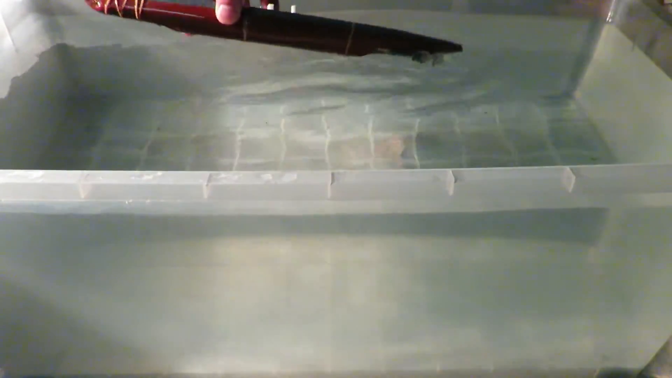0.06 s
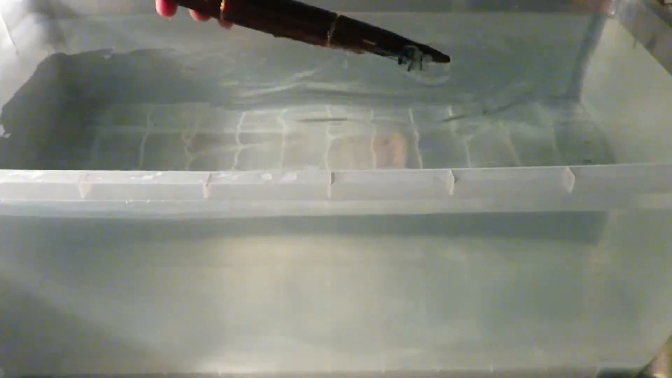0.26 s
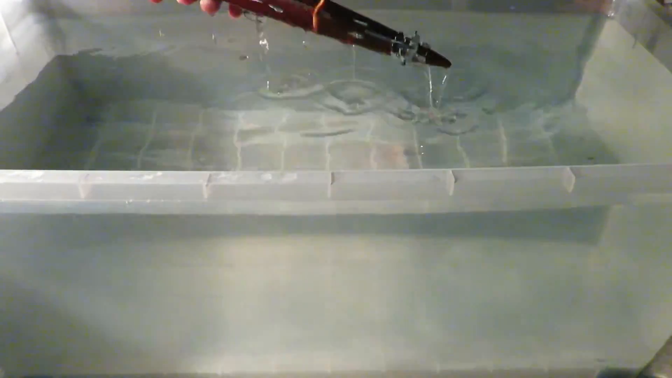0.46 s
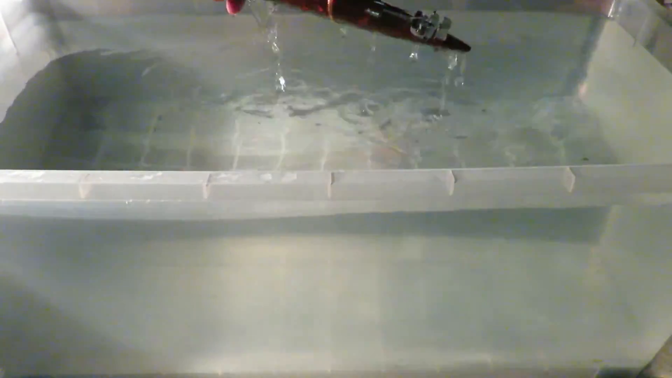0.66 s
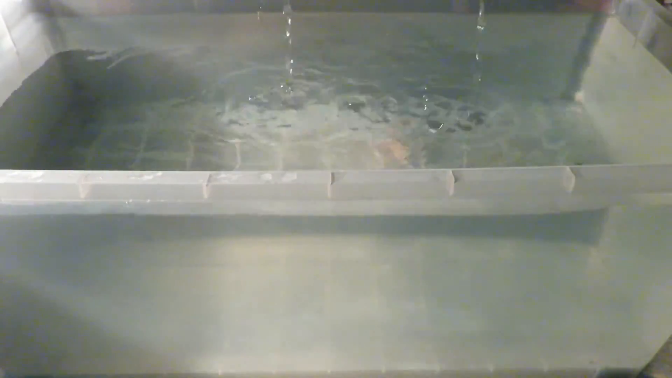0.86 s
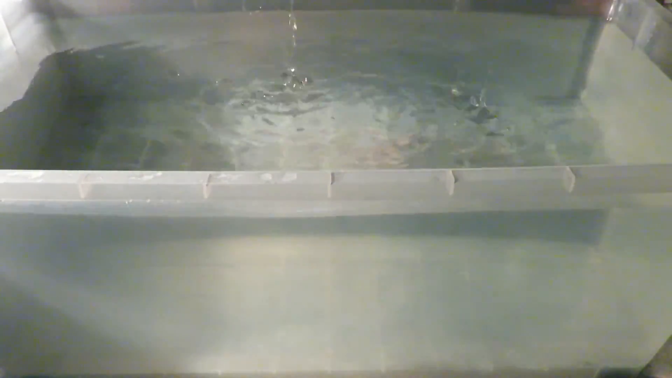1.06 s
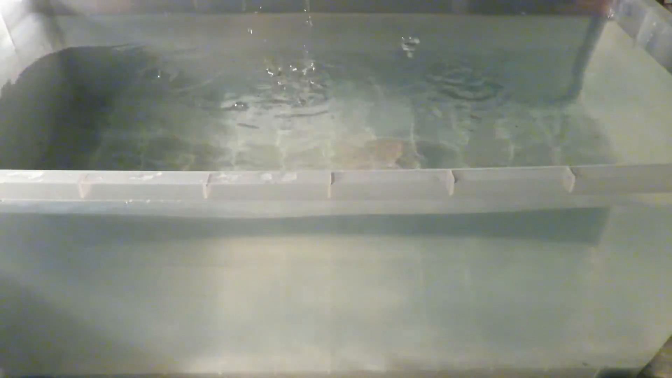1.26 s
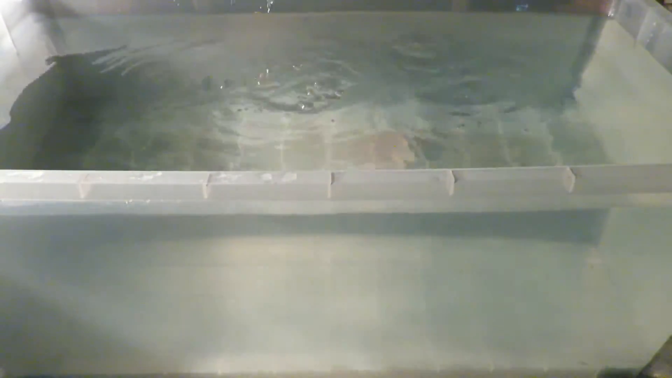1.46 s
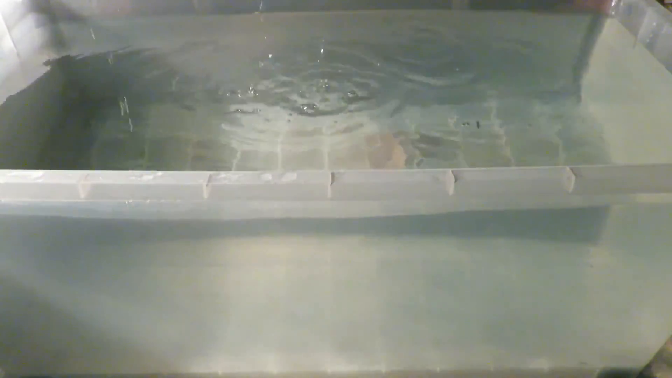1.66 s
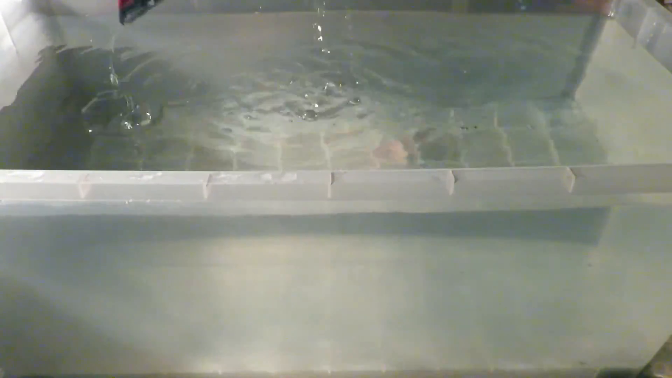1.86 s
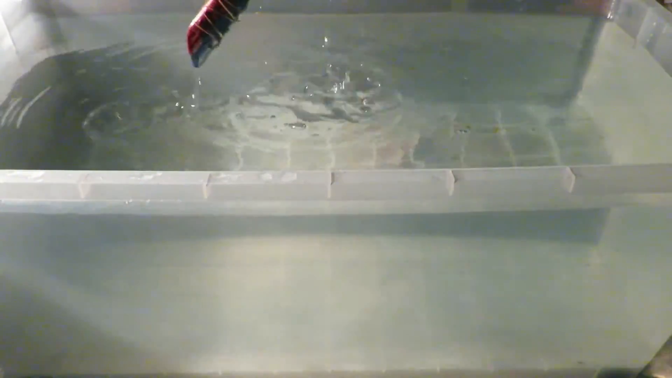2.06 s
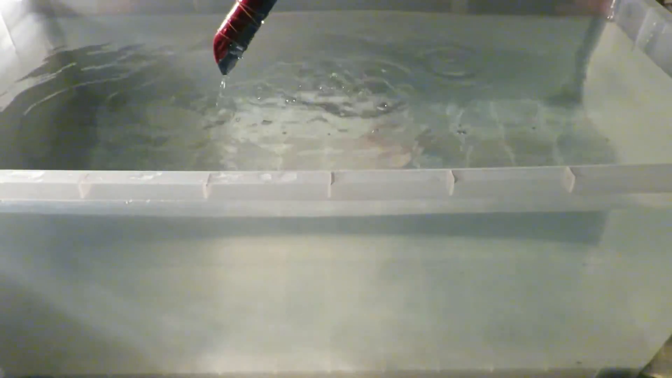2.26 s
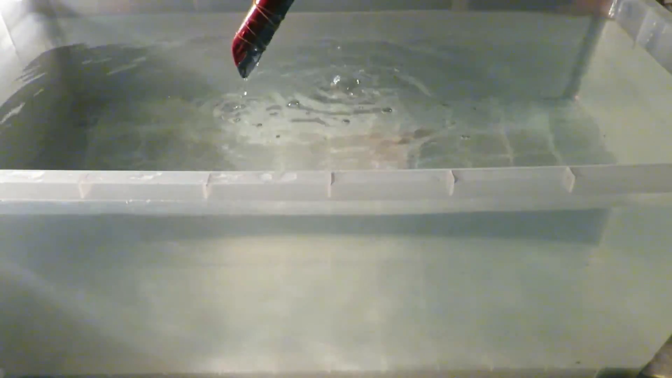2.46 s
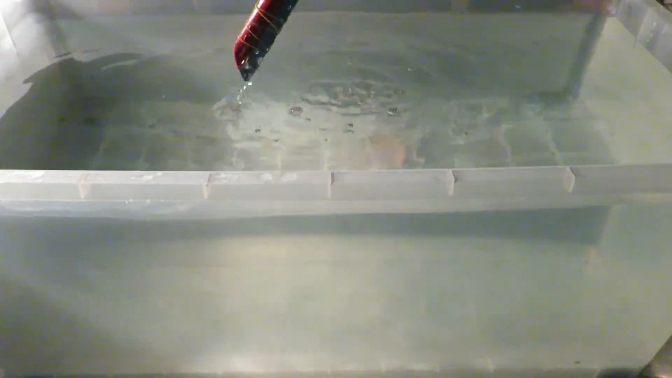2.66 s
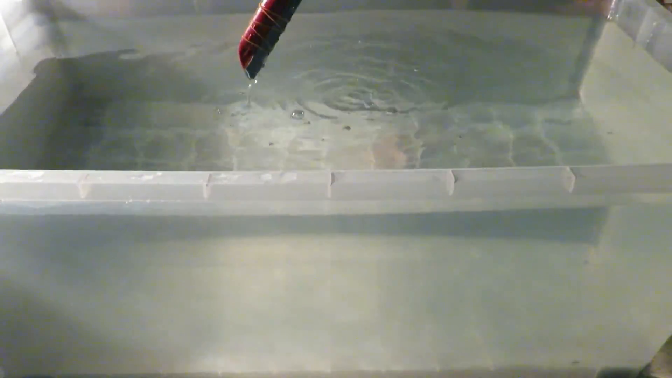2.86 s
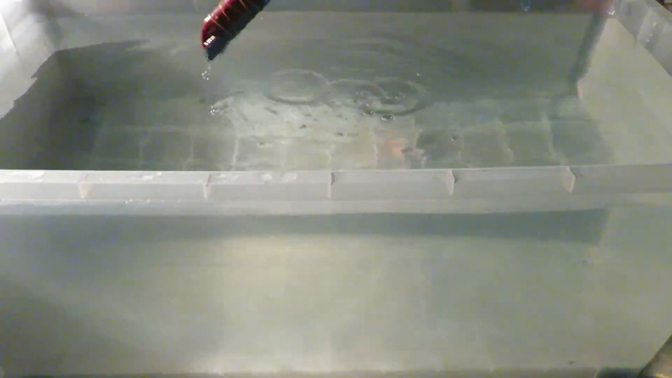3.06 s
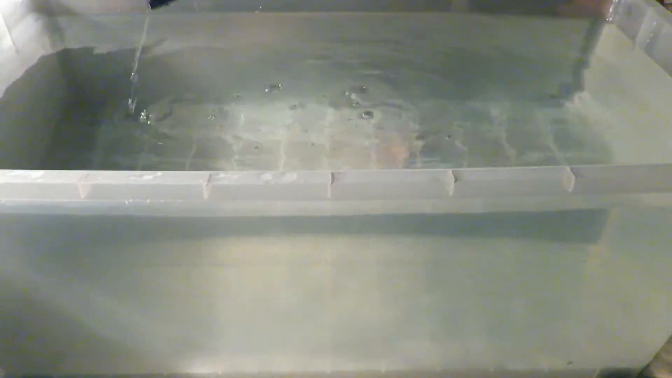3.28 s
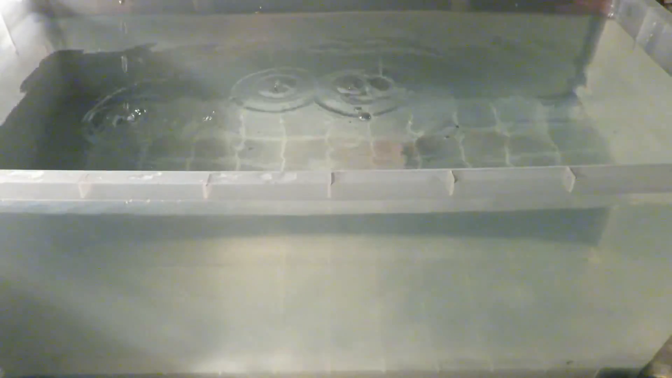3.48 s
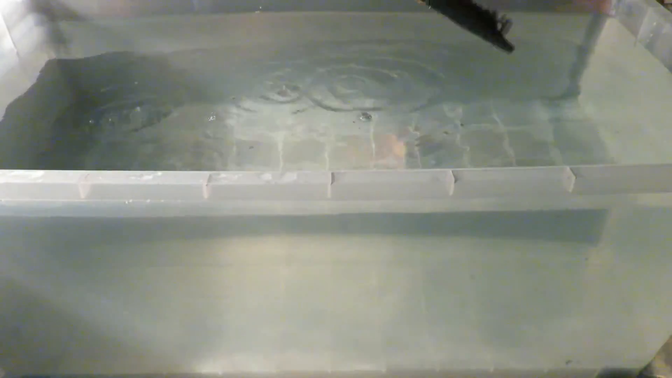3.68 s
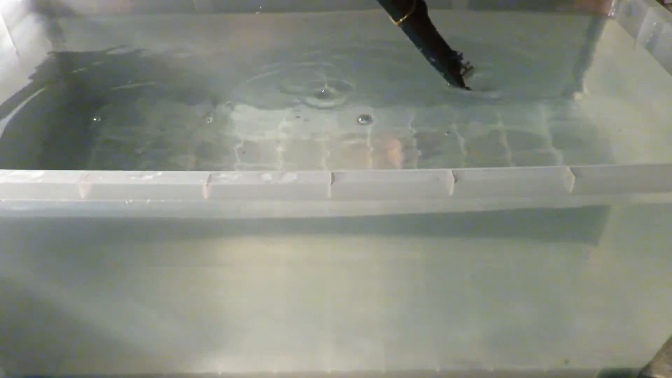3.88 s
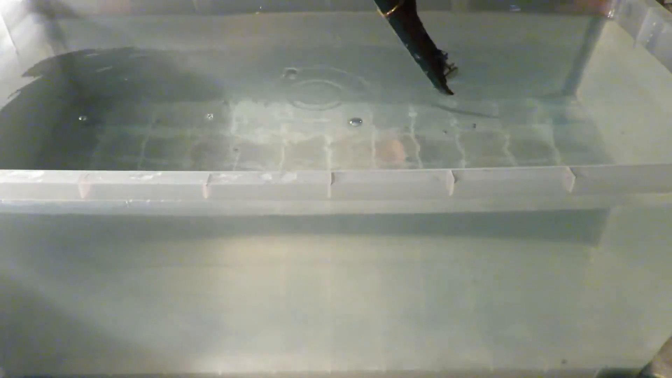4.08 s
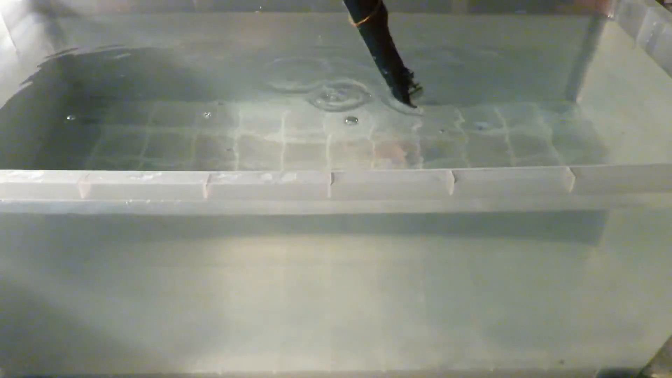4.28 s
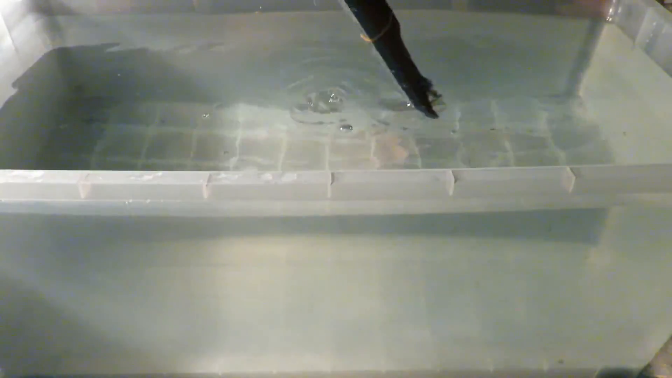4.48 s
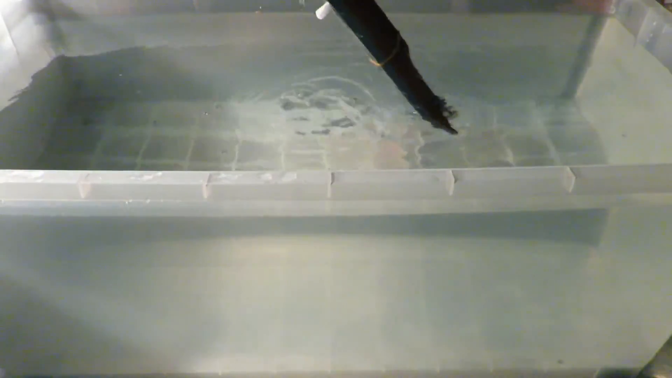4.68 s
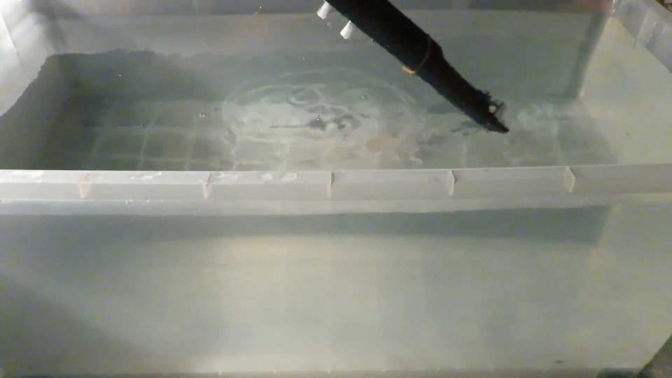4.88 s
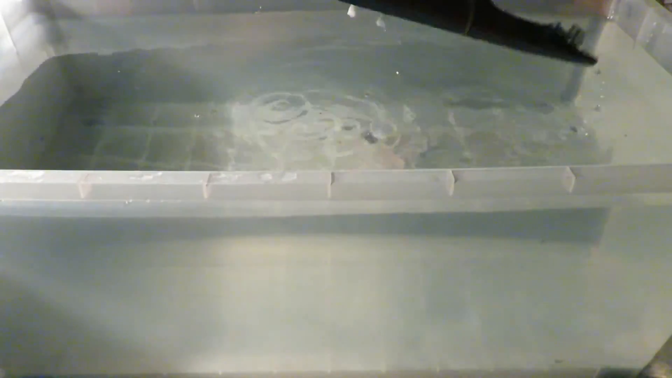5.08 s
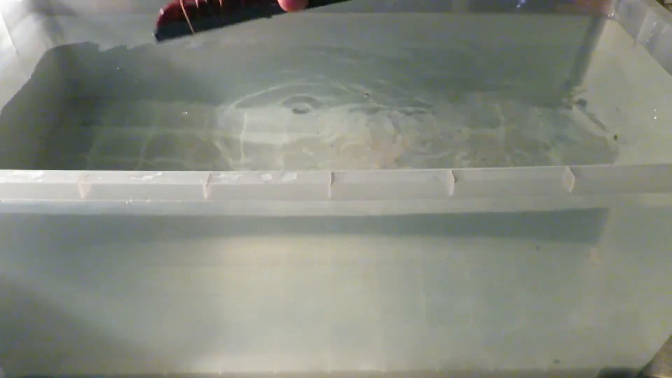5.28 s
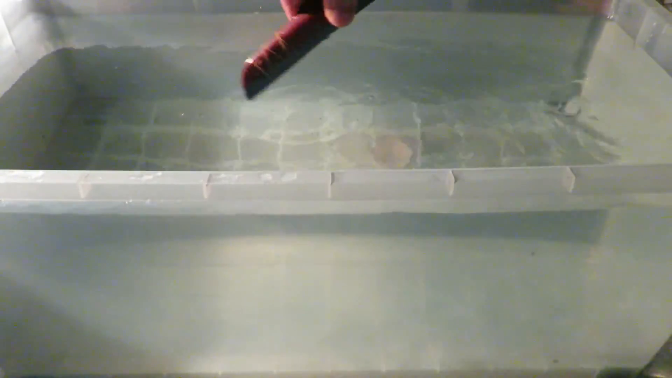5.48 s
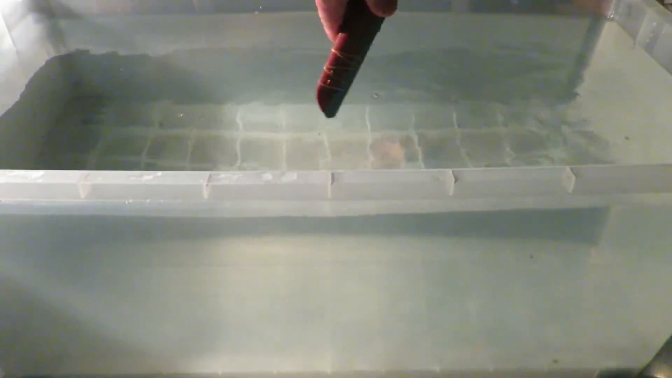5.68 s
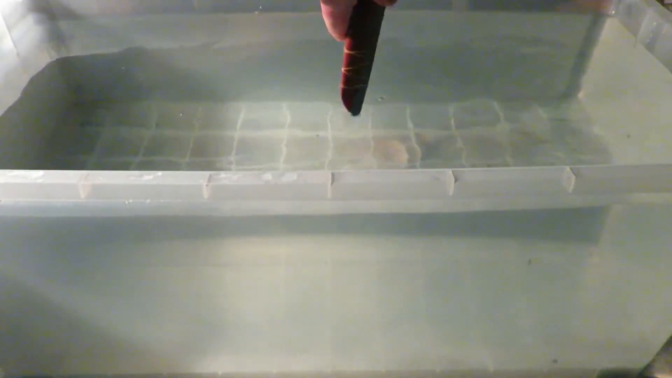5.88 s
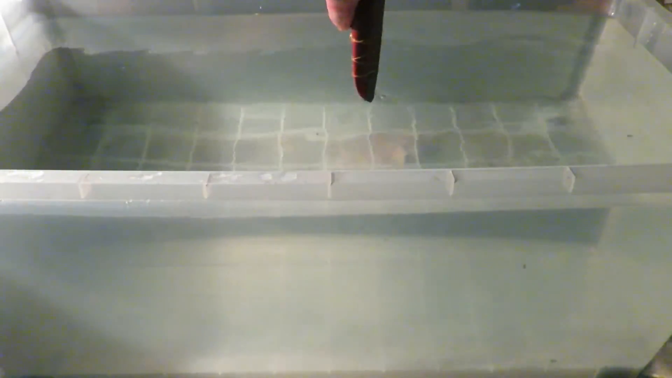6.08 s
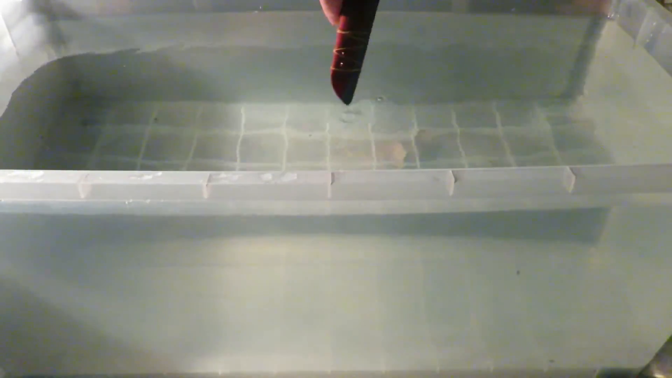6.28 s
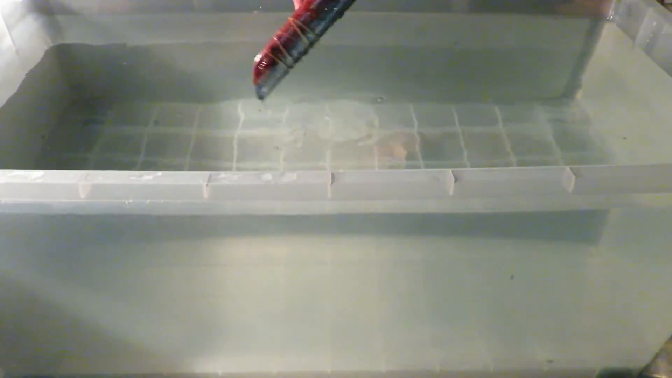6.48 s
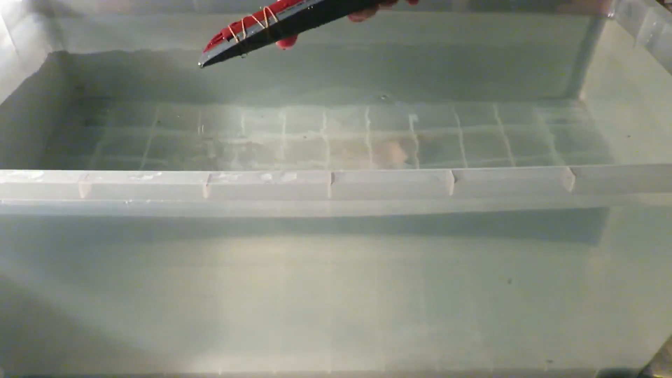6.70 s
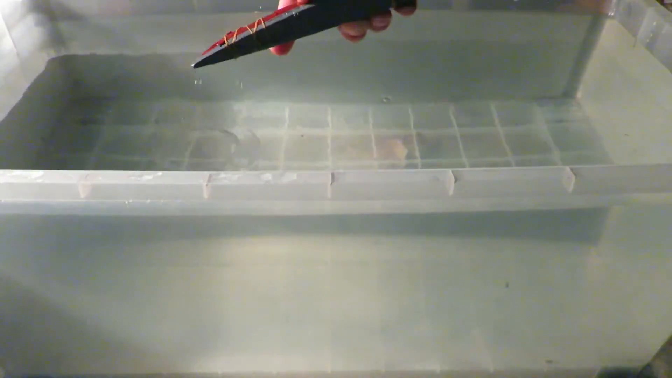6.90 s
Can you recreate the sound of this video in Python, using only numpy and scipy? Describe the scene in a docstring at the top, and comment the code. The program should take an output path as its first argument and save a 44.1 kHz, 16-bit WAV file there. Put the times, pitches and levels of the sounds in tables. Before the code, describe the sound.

A hand-held hollow object drips over a water-filled plastic tub, heard close with short wall echoes. A lively patter of droplets and bubbly plops starts early, eases, then returns as sharp single drips that grow sparse. Clothing rustles briefly halfway through and again near the end; fingers tap the hull faintly. A low unsteady machine hum and gentle room hiss continue throughout.

```python
"""A small room: water drains off a hand-held hollow model into a plastic tub.
Short ticks, mostly drops with a few hand taps and sleeve crackles, are noise splats over tiny ringing sines.
Larger trapped bubbles are sines that bend in pitch, mostly up; spray is a clumped patter of short plinks.
The tub adds a decaying noise tail to the water, the ticks and the hand's modal knocks.
A sleeve rustles as grainy band noise; a machine hums as resonated noise over room rumble and microphone hiss."""
import sys
import numpy as np
from scipy import signal
from scipy.fft import rfft, irfft
from scipy.io import wavfile

SR = 44100
rng = np.random.default_rng(int(sys.argv[2]) if len(sys.argv) > 2 else 0)


def transcribe(u):
    """Save the signal u as a 16-bit wav file named by the first command-line argument.

    u: samples, shape (n,) or (channels, n), limited to [-1, 1]; the rate is SR.
    q: integer samples, one column per channel.
    """
    v = np.clip(np.atleast_2d(u).T, -1, 1)
    q = np.round(v * 32767).astype(np.int16)
    wavfile.write(sys.argv[1], SR, q)


def ratio_of_db(decibels):
    """Turn decibels (scalar or array-like) into linear amplitude factors; 0 dB maps to 1."""
    return 10 ** (np.asarray(decibels, float) / 20)


N = 306054


def rms_one(x):
    """Scales to an rms of 1."""
    return x / np.sqrt(np.mean(x ** 2) + 1e-20)


def at_hz(points, hz):
    """Reads a (frequency, value) curve on a log frequency axis."""
    curve_hz, values = np.transpose(points)
    return np.interp(np.log(hz), np.log(curve_hz), values)


def drift(rate_hz):
    """Slow random curve of rms 1: noise through two equal poles at rate_hz, computed every 40 samples."""
    pole = np.exp(-80 * np.pi * rate_hz / SR)
    white = rng.standard_normal(N // 40 + 2002)
    slow = signal.lfilter([1], [1, -2 * pole, pole * pole], white)[2000:]   # settled part
    return np.interp(np.arange(N) / 40, np.arange(len(slow)), rms_one(slow))


def resonate(x, hz, width_hz):
    """Two-pole resonance with a peak gain of 1."""
    r = np.exp(-np.pi * width_hz / SR)
    zeros = [(1 - r * r) / 2, 0, (r * r - 1) / 2]
    poles = [1, -2 * r * np.cos(2 * np.pi * hz / SR), r * r]
    return signal.lfilter(zeros, poles, x)


def add(out, start_s, sound):
    """Mixes a sound in at start_s."""
    i = round(start_s * SR)
    out[i:i + len(sound)] += sound[:N - i]


def burst(low_hz, high_hz, decay_s, gritty=False):
    """Dying band noise of peak 1; gritty noise swells first and comes in specks."""
    t = np.arange(900) / SR
    band = signal.butter(2, [low_hz, min(high_hz, .45 * SR)], "band", fs=SR, output="sos")
    grains = rng.standard_normal(len(t)) ** (3 if gritty else 1)
    swell = t if gritty else 1
    sound = signal.sosfilt(band, grains * np.exp(-t / decay_s) * swell)
    return sound / np.abs(sound).max()


def room(level_db=-49.5, patchy_db=.8):
    """Third-octave stereo noise: shared rumble, increasingly opposed hiss that flickers above 600 Hz."""
    # relative noise density: (frequency [Hz], density [dB per Hz])
    density = [(15, -55), (25, -4), (87, -8), (141, -5.5), (170, -10), (260, -12.5), (463, -12),
               (607, -16.5), (2690, -25), (4740, -29.5), (12200, -39), (14500, -40), (16000, -67)]
    # left-right correlation: (frequency [Hz], correlation [-1..1])
    likeness = [(60, 1.0), (180, 0.78), (550, -0.15), (1650, 0.071), (4970, -0.25), (15000, -0.67)]
    out, together = 0, drift(2)
    edges_hz = 22 * 2 ** np.arange(0, 9.7, 1 / 3)
    white = rng.standard_normal((2, 2, N))
    for k, (low_hz, high_hz) in enumerate(zip(edges_hz, edges_hz[1:])):
        band = signal.butter(2, [low_hz, high_hz], "band", fs=SR, output="sos")
        mid, side = signal.sosfilt(band, white[k % 2])   # adjacent bands use separate noise
        hz = np.sqrt(low_hz * high_hz)
        alike = np.clip(at_hz(likeness, hz), -1, 1)
        flicker_db = patchy_db * (together + 2 * drift(17.5)) * (hz > 600)
        gain = ratio_of_db(at_hz(density, hz) + flicker_db)
        out = out + gain * (np.sqrt(1 + alike) * mid + np.sqrt(1 - alike) * side * [[1], [-1]])
    return ratio_of_db(level_db) * rms_one(out)


def hum():
    """Unsteady motor drone: noise twice through each narrow resonance."""
    # drone bands: (frequency [Hz], width of each pass [Hz], rms level [dB])
    drones = [(85.6, 23, -52), (170.5, 14.2, -59.5)]
    out = np.zeros(N)
    for hz, width_hz, level_db in drones:
        once = resonate(rng.standard_normal(N), hz, width_hz)
        out += ratio_of_db(level_db) * rms_one(resonate(once, hz, width_hz))
    return out


def rustle(creases_per_s=150, crease_db=15, swell_s=0.15, stop_s=0.14, waver_db=2.0):
    """Cloth swish: separate noise per microphone plus shared crease grains; it swells, holds and stops."""
    # sleeve brushes as the arm turns: (start [s], time to start of fall [s], level [dB], band top [Hz])
    brushes = [(0.0, 0.42, -62, 2980), (3.554, 0.33, -49.5, 5240), (6.193, 0.26, -52, 2700)]
    t, out = np.arange(N) / SR, 0
    creases = ratio_of_db(crease_db) * rng.standard_normal(N) * (rng.random(N) < creases_per_s / SR)
    grainy = rng.standard_normal((2, N)) + creases
    for start_s, length_s, level_db, top_hz in brushes:
        swell = np.clip((t - start_s) / swell_s, 0, 1)
        stop = np.clip((start_s + length_s - t) / stop_s + 1, 0, 1)
        band = signal.butter(2, [800, top_hz], "band", fs=SR, output="sos")
        cloth = signal.sosfilt(band, grainy)
        out = out + ratio_of_db(level_db) * swell * stop * rms_one(cloth)
    return out * ratio_of_db(waver_db * drift(27))


def ticks(splat_db=-4.0, splat_s=0.0019, lag_s=.00001, fizz_db=-14, fizz_s=0.0034, rise=.012,
          cycles_per_20_db=12.9, pan_db=0.37):
    """Stereo ticks: a noise splat, a tiny rising ring like a drop's bubble, then fizz like a falling crown."""
    # short ticks, mostly drop impacts, with a few hand taps and sleeve crackles:
    # (time [s], nominal level [dB], starting ring pitch [Hz])
    events = [(0.159, -35.5, 5300), (0.1927, -35.5, 12600), (0.5625, -25.5, 3870), (0.625, -24.5, 3640),
              (0.66, -25.5, 4440), (0.7084, -24, 4190), (0.737, -30, 10600), (0.745, -30, 7800),
              (0.7756, -22.5, 7300), (0.7995, -28, 11600), (0.822, -28.5, 4030), (0.8282, -12.5, 7650),
              (0.8335, -16, 7750), (0.8385, -32, 12500), (0.902, -28, 3720), (0.93, -20, 6260),
              (0.967, -19.5, 6840), (0.991, -16.5, 11600), (1.0289, -14.5, 10200), (1.063, -28, 4560),
              (1.1005, -27, 10000), (1.1417, -16, 4120), (1.1651, -25, 7900), (1.185, -26, 4430),
              (1.1933, -23.5, 3500), (1.2128, -21.5, 4160), (1.278, -26.5, 5600), (1.301, -28.5, 12800),
              (1.316, -28, 3300), (1.3582, -22, 4520), (1.3657, -26, 5000), (1.3964, -27.5, 12100),
              (1.44, -23.5, 8400), (1.476, -23, 4820), (1.516, -26.5, 4470), (1.592, -36, 7500),
              (1.6636, -37.5, 3800), (1.854, -21, 4170), (1.931, -39, 4800), (2.007, -43, 4250),
              (2.0256, -25, 4100), (2.0568, -20, 9200), (2.0711, -9.5, 8930), (2.0794, -20, 2760),
              (2.133, -23.5, 10400), (2.2046, -17, 11400), (2.2322, -17.5, 8250), (2.2677, -32.5, 9350),
              (2.322, -35.5, 4350), (2.4134, -24, 12100), (2.4496, -30.5, 11800), (2.4772, -26, 3350),
              (2.5236, -31, 5640), (2.5497, -28.5, 3920), (2.5876, -24.5, 13000), (2.6077, -23.5, 11100),
              (2.6586, -27, 9400), (2.769, -28, 5800), (2.8284, -32, 5730), (2.8366, -30, 12750),
              (2.8723, -29.5, 4700), (2.892, -23, 4040), (3.046, -35, 4000), (3.071, -28, 13600),
              (3.138, -33, 5740), (3.1689, -21, 8100), (3.321, -24, 13700), (3.3377, -35.5, 3620),
              (3.4515, -34, 9700), (3.475, -24.5, 5760), (3.495, -25.5, 6400), (3.541, -23, 11600),
              (3.5507, -23.5, 10000), (3.607, -30.5, 3460), (3.725, -40, 6800), (3.739, -46, 3500),
              (3.8437, -37, 2970), (3.913, -43, 2320), (3.9757, -37, 6200), (4.319, -35, 4330),
              (4.3462, -28, 3500), (4.444, -34, 11200), (4.6357, -25, 8500), (4.6636, -32, 7500),
              (4.695, -41, 12000), (5.0213, -39, 6060), (6.64, -44, 5200), (6.786, -36.5, 7200),
              (6.81, -39, 7700)]
    out, t = np.zeros((2, N)), np.arange(900) / SR
    chances = rng.normal(0, 1, (len(events), 4))
    for (start_s, level_db, hz), (pan, lag, bend, wet) in zip(events, chances):
        turns = hz * t
        bent = turns * (1 + rise * abs(bend) * np.minimum(turns, 20) / 2)
        onset = np.minimum(turns, 1)   # full within a cycle
        ring = np.sin(2 * np.pi * bent) * ratio_of_db(-20 * turns / cycles_per_20_db) * onset
        splat = ratio_of_db(splat_db) * burst(0.8 * hz, min(4.4 * hz, 13500), splat_s)
        fizz = ratio_of_db(fizz_db + 3 * np.tanh(wet)) * burst(.6 * hz, 2 * hz, fizz_s, gritty=True)
        spectrum = rfft(ring + splat + fizz)
        for side, channel in zip((1, -1), out):
            late_s = lag_s * (1 + side * np.tanh(lag))   # off-centre ticks reach one microphone first
            shift = np.exp(-2j * np.pi * np.arange(451) * late_s * SR / 900)
            add(channel, start_s, ratio_of_db(level_db + pan_db * side * pan) * irfft(spectrum * shift))
    return out


def tub(x, level_db=-8.5, side_db=-3.5, first_echo_s=0.0017):
    """Dense wall echoes: half-octave noise bands, each with its own decay, mostly alike in both ears."""
    # tub decay: (frequency [Hz], time to fall 60 dB [s])
    decay = [(700, 0.22), (2000, 0.18), (5000, 0.12), (12000, 0.093)]
    t, echoes = np.arange(SR // 3) / SR, 0
    for hz in 500 * 2 ** np.arange(0, 5.2, .5):
        band = signal.butter(2, [hz / 2 ** .25, hz * 2 ** .25], "band", fs=SR, output="sos")
        noise = signal.sosfilt(band, rng.standard_normal((2, len(t))))
        echoes = echoes + noise * ratio_of_db(-60 * t / at_hz(decay, hz))
    echoes = echoes * (t > first_echo_s) / np.sqrt(np.sum(echoes[0] ** 2))
    mid, side = signal.fftconvolve(x[None], echoes, axes=1)[:, :N]
    # close-set microphones differ more at short wavelengths
    side = signal.lfilter(*signal.butter(1, 5000, "high", fs=SR), side)
    return ratio_of_db(level_db) * (mid + ratio_of_db(side_db) * side * [[1], [-1]])


def knocks(share_db=-11.0, crack_db=-9.0, luck_db=1.7):
    """Each tap strikes every mode of the hollow hull at a random strength, with a crack of noise."""
    # fingers shift on the hull: (time [s], reference level [dB])
    taps = [(0.215, -36), (4.207, -35), (4.248, -37), (5.1637, -28)]
    # hull modes: (frequency [Hz], relative level [dB], time to fall 60 dB [s])
    modes = [(596, -3, 0.032), (1050, 1, 0.023), (1450, 6, 0.015), (1930, 6, 0.011), (2500, 7, 0.006),
             (3500, -10, 0.011)]
    out, t = np.zeros(N), np.arange(4000) / SR
    luck = rng.normal(0, luck_db, (len(taps), len(modes)))
    for (start_s, level_db), extras_db in zip(taps, luck):
        for (hz, mode_db, t60_s), extra_db in zip(modes, extras_db):
            loss_db = 60 * t / t60_s
            mode = ratio_of_db(level_db + share_db + mode_db + extra_db - loss_db) * np.sin(2 * np.pi * hz * t)
            add(out, start_s, mode)
        add(out, start_s, ratio_of_db(level_db + crack_db) * burst(5700, 9700, 0.00085))
    return out


def bubbles(bend_per_cycle=0.081, closing_s=0.0017, kick=0.21, kick_hz=1200, wobble_db=2.5,
            fade_db=-4, fade_db_per_cycle=-.3, rise_db_per_octave=11,
            blow_db=-3.5, blow_db_per_octave=-3, blow_s=0.002):
    """A trapped bubble rings as a sine whose pitch bends, mostly up near the surface, until it bursts."""
    # trapped bubbles: (time [s], level [dB], starting pitch [Hz], life [s], end pitch / start pitch)
    trapped = [(0.217, -44.5, 734, 0.019, 0.77), (0.596, -38, 1680, 0.02, 1.14),
               (0.627, -26, 2300, 0.0049, 0.77), (0.627, -34.5, 1590, 0.016, 0.81),
               (0.642, -27.5, 1252, 0.012, 1.05), (0.67, -27.5, 1150, 0.017, 0.96),
               (0.687, -18.5, 2880, 0.00088, 1.07), (0.773, -31, 1830, 0.004, 1),
               (0.786, -35, 1120, 0.026, 0.87), (0.868, -29, 1730, 0.0082, 1.1),
               (0.873, -27.5, 2860, 0.0038, 0.97), (0.91, -30, 2020, 0.004, 0.82),
               (0.934, -30.5, 2470, 0.0061, 1), (0.934, -38, 2940, 0.0044, 1.4),
               (0.989, -25.5, 945, 0.0078, 0.88), (1.012, -33.5, 1865, 0.009, 1.6),
               (1.029, -33.5, 790, 0.029, 1.6), (1.062, -29, 873, 0.019, 1.1),
               (1.062, -30.5, 1800, 0.01, 1.25), (1.083, -31, 853, 0.026, 1.08),
               (1.084, -32, 3090, 0.0058, 1.87), (1.125, -29.5, 1050, 0.0031, 1),
               (1.142, -27.5, 889, 0.044, 1.19), (1.143, -22.5, 1560, 0.0029, 0.92),
               (1.191, -34, 1008, 0.024, 1.05), (1.235, -25, 1280, 0.007, 1.2),
               (1.262, -28, 1860, 0.0038, 1.09), (1.277, -20.5, 993, 0.019, 1.38),
               (1.277, -19.5, 1240, 0.0053, 0.97), (1.28, -35, 2080, 0.0091, 1.9),
               (1.317, -28.5, 1002, 0.046, 1), (1.357, -28, 2036, 0.0086, 2.5),
               (1.374, -19.5, 1230, 0.0084, 1.27), (1.405, -35.5, 1070, 0.0089, 1.06),
               (1.437, -24.5, 1300, 0.017, 1.2), (1.479, -33, 2130, 0.0062, 0.78),
               (1.517, -36, 2134, 0.024, 1.17), (1.555, -43.5, 1470, 0.0047, 2.5),
               (1.598, -40, 2780, 0.0076, 1.3), (1.794, -17.5, 888, 0.038, 1.5),
               (1.854, -22.5, 1810, 0.0082, 0.91), (1.851, -20, 2280, 0.0013, 0.95),
               (2.071, -25.5, 1251, 0.023, 0.95), (2.073, -15.5, 2070, 0.0043, 1.2),
               (2.187, -28, 2800, 0.004, 1.1), (2.199, -39.5, 2060, 0.0066, 0.99),
               (2.247, -35, 3550, 0.011, 1.6), (2.416, -34, 2430, 0.011, 1.1),
               (2.441, -33, 2060, 0.022, 1.3), (2.476, -29, 3000, 0.0072, 1.4),
               (2.529, -41, 917, 0.039, 2.2), (2.575, -36.5, 1117, 0.024, 1.8),
               (2.622, -21, 1710, 0.014, 1.27), (2.647, -35, 1730, 0.016, 0.93),
               (2.726, -21, 1965, 0.017, 1.57), (2.837, -26.5, 2080, 0.0061, 0.91),
               (2.898, -36.5, 2380, 0.0088, 0.72), (2.988, -31, 1213, 0.034, 1.76),
               (3.027, -47, 2340, 0.016, 1.7), (3.348, -42.5, 2770, 0.013, 1.3),
               (3.514, -37, 2118, 0.039, 1.8), (3.559, -34.5, 3030, 0.0089, 0.57),
               (3.622, -35, 1600, 0.0064, 0.91), (4.306, -29.5, 2910, 0.0038, 0.87),
               (4.363, -18.5, 1723, 0.0081, 1.12), (4.494, -29.5, 3200, 0.0016, 0.98)]
    out = np.zeros(N)
    for start_s, level_db, hz, life_s, ratio in trapped:
        t = np.arange(round((life_s + .03) * SR)) / SR
        age, cycles = t / life_s, hz * life_s
        # long-ringing bubbles hold their pitch, then bend late
        pitch_hz = hz * ratio ** (np.minimum(age, 1) ** (1 + bend_per_cycle * cycles))
        # a bubble radiates better as its pitch climbs
        gain_db = (fade_db + fade_db_per_cycle * cycles) * age + rise_db_per_octave * np.log2(pitch_hz / hz)
        stop = np.exp(-np.maximum(t - life_s, 0) / closing_s)
        ring = np.sin(2 * np.pi * np.cumsum(pitch_hz) / SR) * ratio_of_db(gain_db) * stop
        # big bubbles swing hardest in their first cycles
        first = 1 + kick / (1 + (hz / kick_hz) ** 4) * np.exp(-t * hz / 2)
        onset = np.minimum(t * hz, 1)   # full within a cycle
        add(out, start_s, ratio_of_db(level_db) * ring * first * onset)
        # the blow that traps it, relatively harder for big bubbles
        hit_db = level_db + blow_db + blow_db_per_octave * np.log2(hz / 1000)
        add(out, start_s, ratio_of_db(hit_db) * burst(hz, 3 * hz, blow_s))
    return out * ratio_of_db(wobble_db * drift(50))   # surface ripples make the ring waver


def spray(per_s=500, clump_db=6, size_db=7.0, cycles_per_20_db=12, rise=0.008):
    """Droplets fall in clumps; each plinks briefly and rises, at pitches over three octaves and more."""
    # patter curve: (time [s], level [dB], tilt about 4 kHz [dB per octave])
    curve_s, level_db, tilt_db = np.transpose([(.5, -95, -6), (.62, -41.5, 4), (1.45, -46.5, 0),
                                               (1.62, -53.5, 6), (2.0, -48, 4.5), (2.9, -72.5, 16),
                                               (3.9, -75, 8.5), (4.8, -64, 6)])
    t = np.arange(N) / SR
    tilt_db = np.interp(t, curve_s, tilt_db)
    level_db = np.interp(t, curve_s, level_db, left=-99, right=-99)
    sizes = ratio_of_db(size_db * np.minimum(rng.exponential(1, N), 3)) * rng.choice([-1, 1], N)
    born = rng.random(N) < per_s * ratio_of_db(clump_db * drift(15)) / SR
    pitches_hz, dealt, out = np.geomspace(1200, 13000, 18), rng.integers(0, 18, N), 0
    for k, hz in enumerate(pitches_hz):
        turns = hz * np.arange(1500) / SR
        bent = turns * (1 + rise * np.minimum(turns, 20) / 2)
        plink = np.sin(2 * np.pi * bent) * ratio_of_db(-20 * turns / cycles_per_20_db)
        patter = signal.oaconvolve(sizes * born * (dealt == k), plink)[:N]
        out = out + ratio_of_db(tilt_db * np.log2(hz / 4000)) * patter
    return ratio_of_db(level_db) * rms_one(out)


def scene():
    """Water, ticks and knocks excite the tub; rustle, room noise and hum stay dry."""
    in_tub = ticks() + knocks() + bubbles() + spray()
    return room() + hum() + rustle() + in_tub + tub(in_tub.mean(axis=0))


def band_limit(x):
    """A steep low-pass at the top of the band."""
    return signal.sosfilt(signal.butter(12, 16820, fs=SR, output="sos"), x)


def record(dry):
    """Steep low-pass, 50 dB down from 17.2 kHz."""
    low_pass = signal.cheby2(8, 50, 17200, fs=SR, output="sos")
    mix = signal.sosfilt(low_pass, dry)
    return band_limit(mix)


dry = scene()
out = record(dry)
transcribe(out)
```